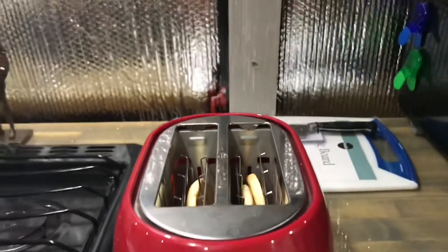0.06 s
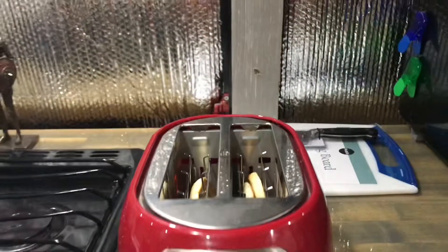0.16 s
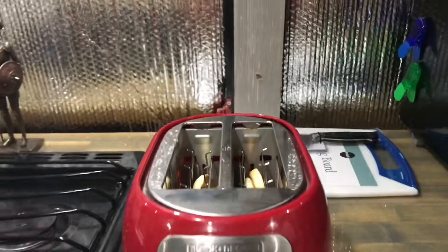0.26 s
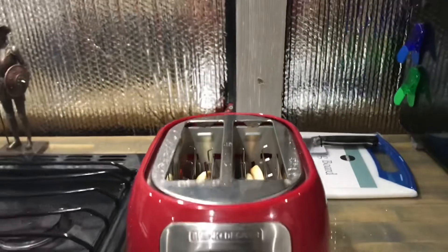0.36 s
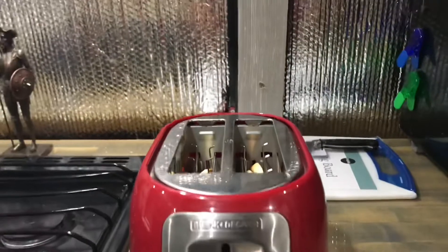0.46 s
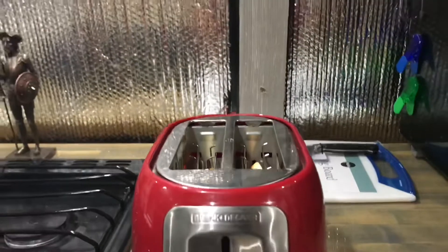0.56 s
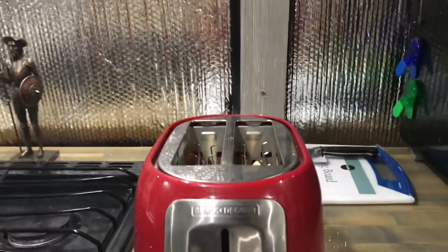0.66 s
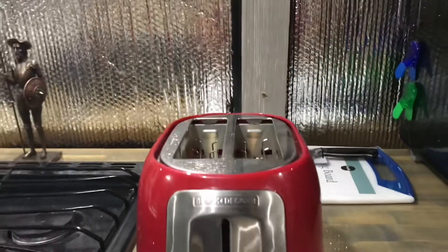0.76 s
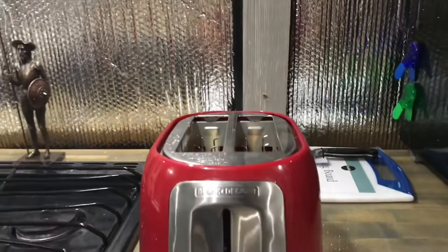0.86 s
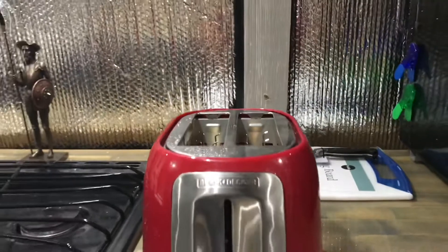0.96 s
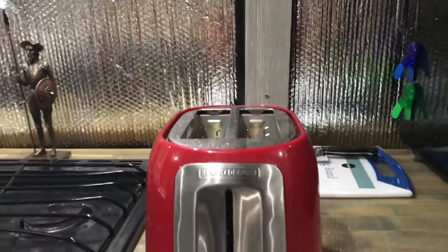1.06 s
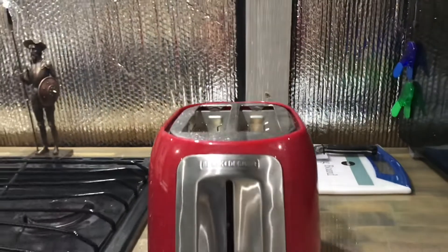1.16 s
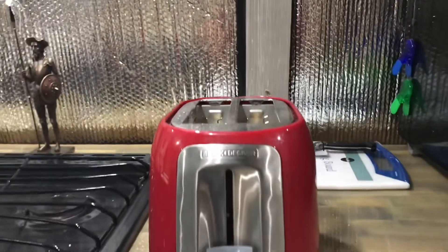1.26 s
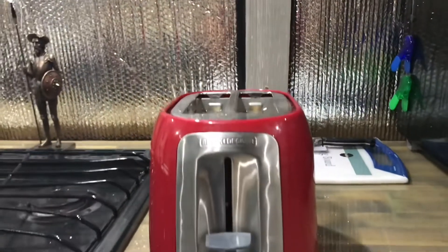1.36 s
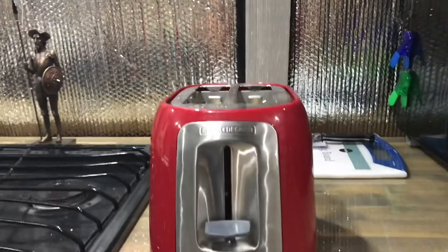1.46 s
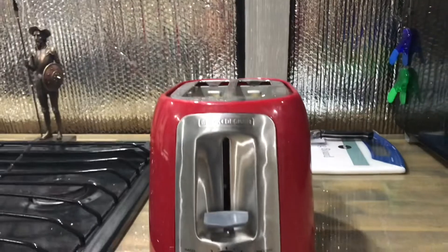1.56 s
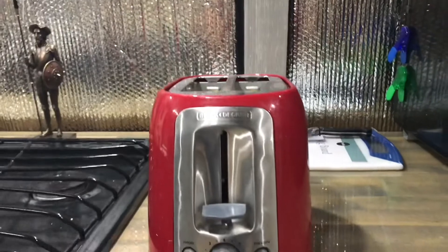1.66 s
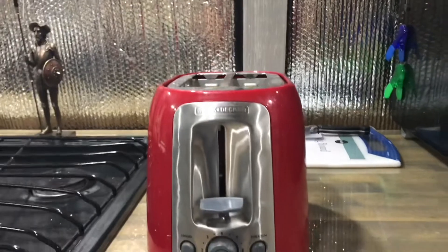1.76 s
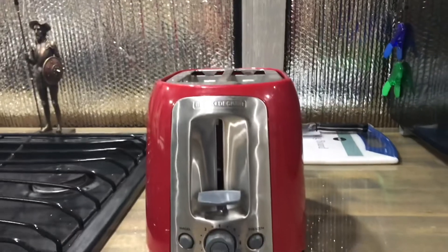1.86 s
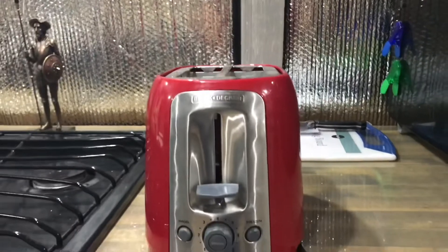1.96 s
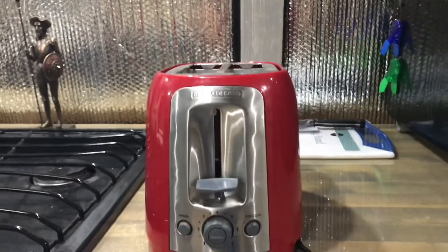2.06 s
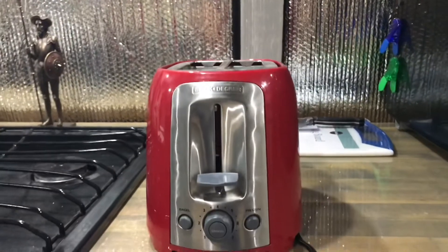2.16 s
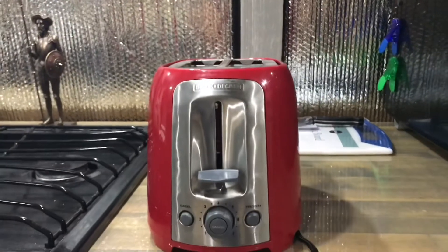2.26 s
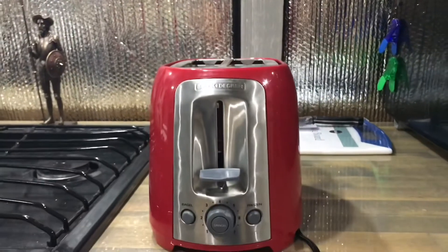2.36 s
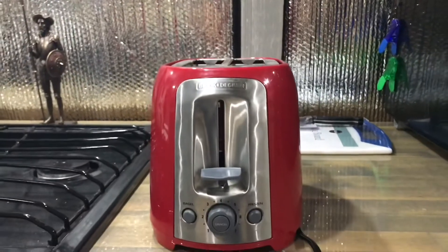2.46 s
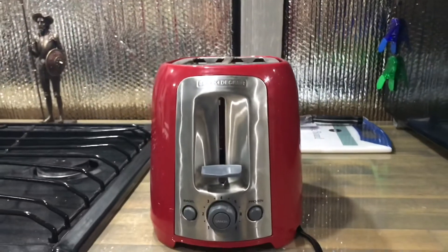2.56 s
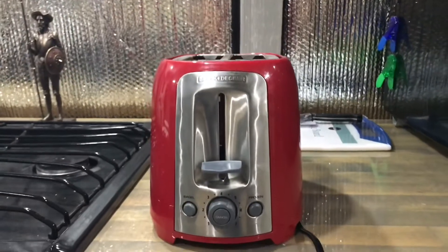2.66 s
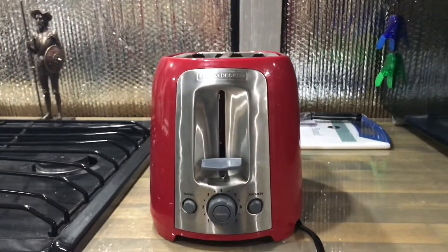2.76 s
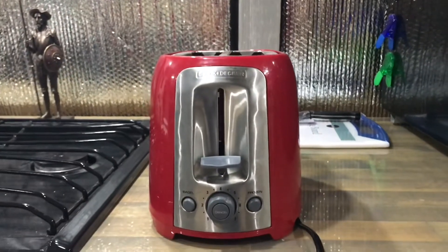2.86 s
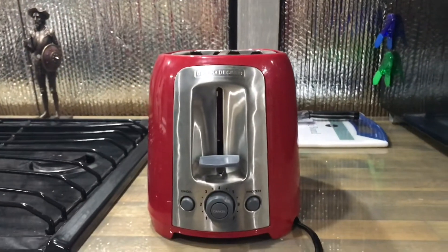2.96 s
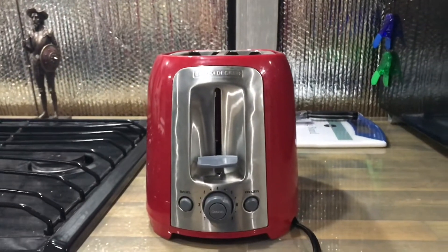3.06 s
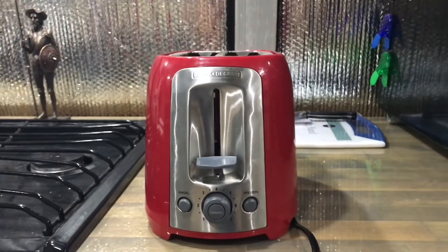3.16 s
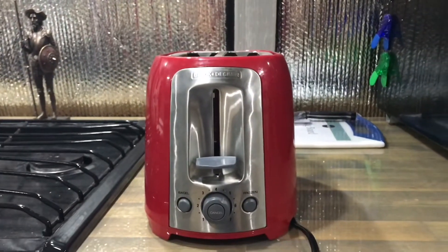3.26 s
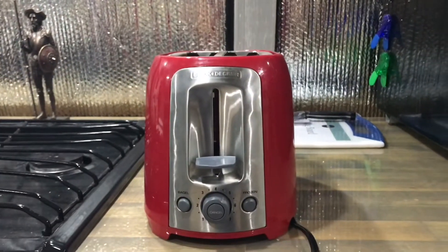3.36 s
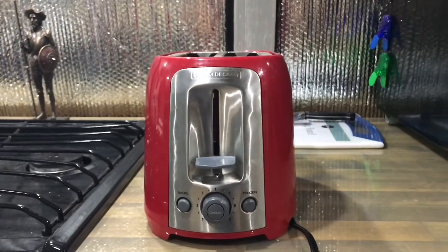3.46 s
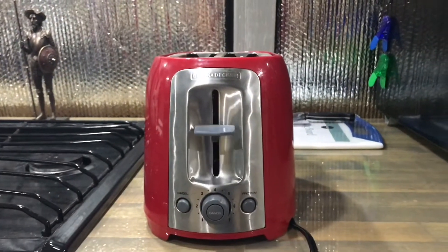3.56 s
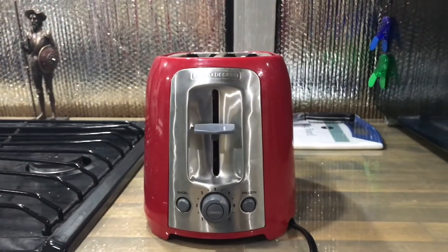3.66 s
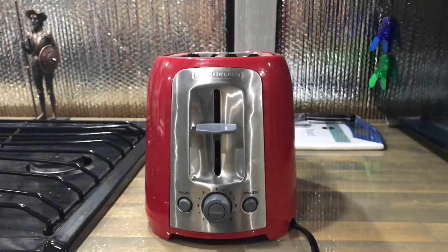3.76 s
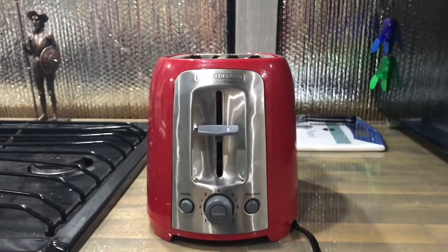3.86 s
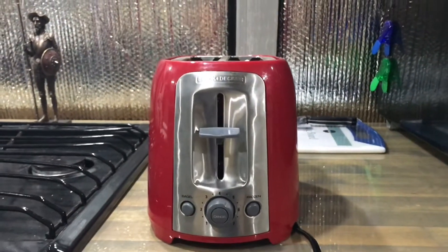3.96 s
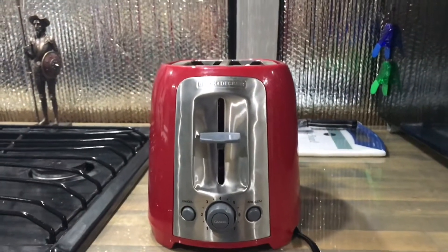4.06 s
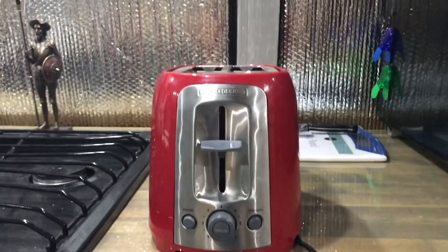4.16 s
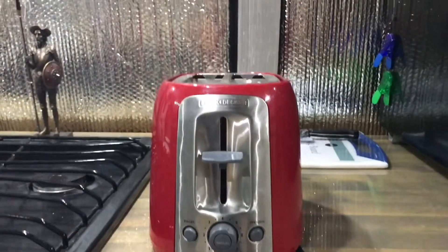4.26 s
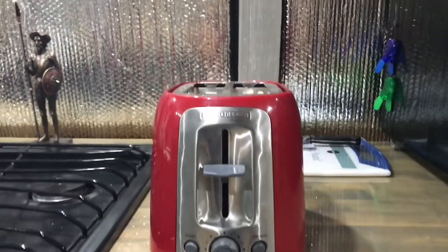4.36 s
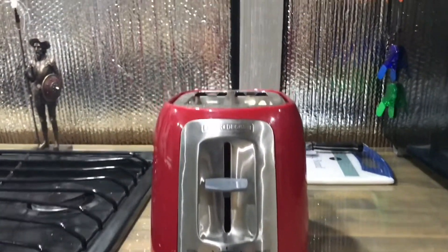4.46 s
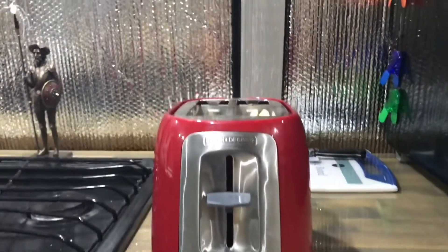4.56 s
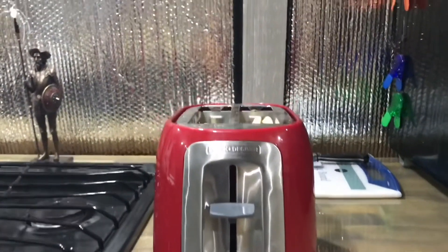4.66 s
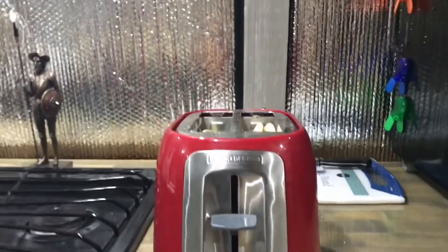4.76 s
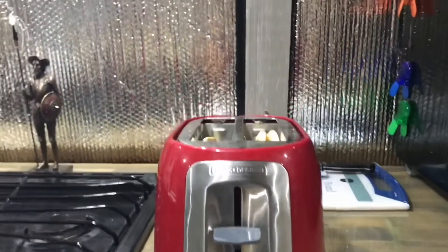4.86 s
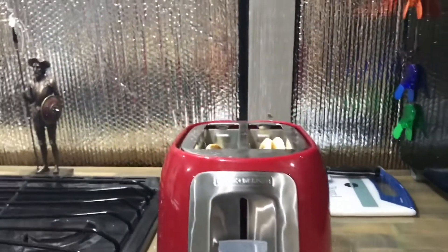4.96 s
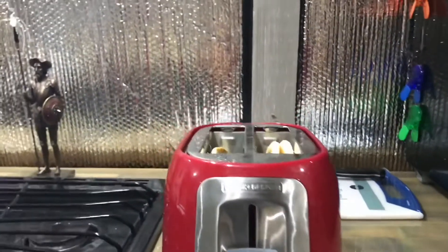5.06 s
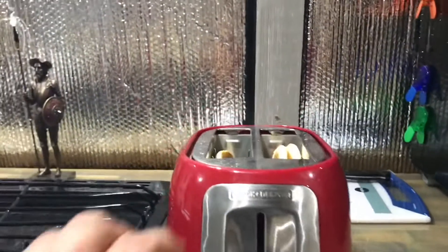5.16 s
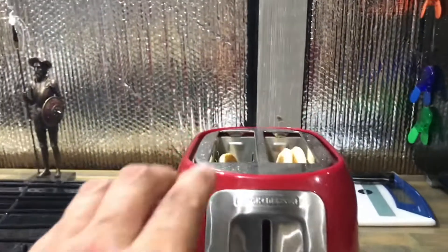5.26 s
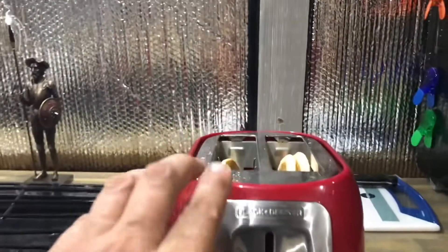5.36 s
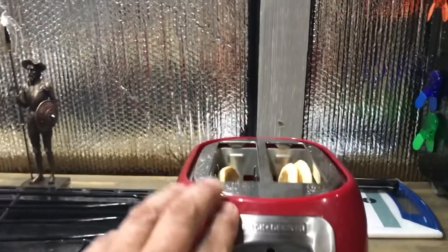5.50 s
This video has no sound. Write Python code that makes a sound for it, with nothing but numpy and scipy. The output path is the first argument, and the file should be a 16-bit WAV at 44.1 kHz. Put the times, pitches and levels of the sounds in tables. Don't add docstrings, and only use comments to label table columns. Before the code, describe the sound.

Close up in a small camper kitchen, a compressor hums very low beside a hissing fan. Before two seconds the tone thins slightly as the microphone turns. Around 3.4 seconds a toaster pops: latch click, wire rack jump, carriage slam and short metallic rattle. The hum continues, slightly faster, and a small panel snap follows at about 4.6 seconds.

```python
import sys
import numpy as np
from scipy import signal
from scipy.fft import rfft, irfft, next_fast_len
from scipy.io import wavfile
from scipy.ndimage import uniform_filter1d, map_coordinates

SR = 44100
rng = np.random.default_rng(int(sys.argv[2]) if len(sys.argv) > 2 else 0)


def natural_amplitude(level_db):
    exponent = np.asarray(level_db, float) / 20
    return 10 ** exponent


def wav_out(sig):
    wavfile.write(sys.argv[1], SR, np.round(np.clip(np.atleast_2d(sig).T, -1, 1) * 32767).astype(np.int16))


N = 243873
STEP_S, UNLOAD_S = 1.69, 3.43
LATCH_S, LIFT_S, STOP_S = 3.3818, 3.3868, 3.3903


def unit(x):
    return x / np.sqrt(np.mean(x ** 2) + 1e-20)


def along(points, hz):
    f, v = np.transpose(points)
    return np.interp(np.log(hz + 1), np.log(f + 1), v)


def resonances(table, hz):
    return natural_amplitude(sum(db / (1 + (2 * (hz - centre) / width) ** 2) for centre, width, db in table))


def filtered(x, response):
    m = next_fast_len(len(x) + 8192)
    return irfft(rfft(x, m) * response(np.fft.rfftfreq(m, 1 / SR)), m)[:len(x)]


def wobble(rate):
    return map_coordinates(rng.standard_normal(int(N * rate / SR) + 4), [np.arange(N) * rate / SR])


def ramp(start_s, length_s):
    return np.clip((np.arange(N) / SR - start_s) / length_s, 0, 1)


def state(early, later, free):
    stepped = ramp(STEP_S - .006, .012)
    unloaded = ramp(UNLOAD_S - .025, .05)
    return early + (later - early) * stepped + (free - later) * unloaded


def rush(response, patchy_db, drift_db=1.7):
    z = signal.stft(rng.standard_normal(N + 512), nperseg=512)[2]

    def smooth(bins, frames):
        field = uniform_filter1d(rng.standard_normal(z.shape), size=bins, axis=0)
        return unit(uniform_filter1d(field, size=frames, axis=1))

    gain = natural_amplitude(patchy_db * smooth(6, 14) + drift_db * smooth(2, 90))
    return unit(filtered(signal.istft(z * gain, nperseg=512)[1][:N], response))


def bursts(rows):
    out, t = np.zeros(N + 4096), np.arange(4096) / SR
    for s, db, hz, octaves, t60 in rows:
        noise = rng.standard_normal(4096)
        puff = filtered(noise, lambda f: np.exp(-(np.log2((f + 1) / hz) / octaves) ** 2))
        puff = puff * natural_amplitude(-60 * t / t60) * (1 - np.exp(-t / (0.035 * t60)))
        out[round(s * SR):][:4096] += natural_amplitude(db) * puff / np.abs(puff).max()
    return out[:N]


def puffs_after(start_s, puffs):
    return [(start_s + lag, db, hz, octaves, .018) for lag, db, hz, octaves in puffs]


def ring(start_s, modes, spread_s, rise_s):
    out, t = np.zeros(N), np.arange(SR // 2) / SR
    for hz, db, t60 in modes:
        late, phase = rng.uniform(size=2)
        swing = np.sin(2 * np.pi * (hz * t + phase * (spread_s > 0)))
        envelope = natural_amplitude(db - 60 * t / t60) * (1 - np.exp(-t / rise_s))
        out[round((start_s + late * spread_s) * SR):][:len(t)] += envelope * swing
    return out


def struck(start_s, modes):
    return natural_amplitude(-13.5) * ring(start_s, modes, .0012, .001)


def compressor():
    # (multiple, before the step [dB], after the step [dB], unloaded [dB])
    orders = [(1, -32.5, -34.5, -34.5), (2, -63, -62, -52), (3, -62, -65, -80), (4, -46.5, -47.5, -47),
              (5, -51, -54, -57), (6, -68, -62, -55), (8, -62, -65, -67), (16, -62, -64, -64),
              (18, -69, -71, -63), (20, -62, -71, -68), (21, -70, -67, -66), (22, -63, -63, -70),
              (23, -60, -59, -59), (24, -56.5, -63, -68), (26, -68, -69, -79), (32, -75, -77, -69),
              (50, -75, -75, -76)]
    shaft_hz = state(54.4, 54.42, 55.12)
    angle = 2 * np.pi * np.cumsum(shaft_hz) / SR + 0.017 * wobble(8)
    path = state(-1.35, -.65, -.65)
    hum = np.zeros(N)
    for k, *db in orders:
        flutter_db = min(.3 * (k - 1) + .1, 2.5) * wobble(4)
        start = path if k == 1 else state(*rng.uniform(0, 2 * np.pi, 3))
        hum += np.sqrt(2) * natural_amplitude(state(*db) + flutter_db) * np.cos(k * angle + start)
    return hum, angle


def fan_blades():
    level_db = state(-55, -63, -56) + 2.8 * wobble(3.54)
    hz = state(87, 87, 89) + 0.38 * wobble(2.94)
    return np.sqrt(2) * natural_amplitude(level_db) * np.sin(2 * np.pi * np.cumsum(hz) / SR)


def mains_buzz():
    level_db = -57.0 + .8 * wobble(2.6)
    return np.sqrt(2) * natural_amplitude(level_db) * np.sin(2 * np.pi * 120 * np.arange(N) / SR)


def fan_air(angle):
    # (frequency [Hz], density [dB per Hz])
    air_low = [(25, -59), (40, -38), (50, -14), (72, -10.5), (83, -11), (105, -18), (165, -15), (220, -13),
               (350, -22.5), (400, -27), (626, -16.5), (782, -23), (1260, -21), (1500, -24)]
    # (frequency [Hz], density [dB per Hz])
    air_high = [(710, -47), (1290, -14.5), (1730, -7.5), (2250, -10), (2590, -12.5), (3400, -11.5),
                (3900, -14.5), (4960, -18.5), (6000, -19), (7500, -22), (9300, -23.5), (12200, -26.5),
                (14600, -23), (15700, -21.5)]
    # (frequency [Hz], width [Hz], lift [dB])
    casing = [(351, 97, 12.5), (440, 15.3, 11), (629, 14, 1.5), (2310, 32, 6), (2778, 28, 7),
              (3497, 117, 5.5), (4550, 38, 7.5), (5800, 55, -1.5), (6210, 80, 4), (7200, 60, 5.5),
              (8560, 60, -4.5), (9300, 300, 1.5), (12920, 120, 4), (14850, 120, 3)]
    # (frequency [Hz], density [dB per Hz])
    vent_air = [(250, -39.5), (400, -2), (550, -2.5), (900, -1.5), (1300, -9.5), (1600, -10.5), (2200, -56)]

    def low_colour(f):
        return natural_amplitude(along(air_low, f)) * resonances(casing, f) / (1 + (f / 1600) ** 8)

    def high_colour(f):
        return natural_amplitude(along(air_high, f)) * resonances(casing, f)

    low = natural_amplitude(-44.0 + 0.18 * wobble(3.27)) * rush(low_colour, patchy_db=0.34)
    high = natural_amplitude(-52.0 + 0.51 * wobble(3.28)) * rush(high_colour, patchy_db=0.5)
    vent = natural_amplitude(state(-48.5, -70, -66)) * rush(lambda f: natural_amplitude(along(vent_air, f)), patchy_db=-1.5)
    throb = 1 + 0.016 * np.cos(angle) + 0.14 * np.cos(2 * angle)
    return throb * (low + vent) + high


def ticks():
    # (time [s], level [dB], centre [Hz], width [octaves], t60 [s])
    small = [
        (2.007, -40, 2500, 1, .05),
        (3.6145, -40, 4000, 1, .004),
        (3.693, -51, 13000, .1, .08),
        (4.6287, -30, 12000, .5, .003),
        (4.63, -27, 12500, .5, .002),
        (5.46, -48, 12400, .12, .07),
    ]
    return bursts(small)


def latch():
    # (time after release [s], level [dB], centre [Hz], width [octaves])
    contacts = [
        (-.0023, -44, 1500, 1),
        (0, -13, 6000, 2.2),
        (.0014, -13, 3000, 1.6),
        (.003, -13, 4500, 1.1),
    ]
    # (frequency [Hz], level [dB], t60 [s])
    modes = [(3120, -5, .03), (3650, -7, .03), (5040, -1, .035), (5390, -7, .08)]
    return puffs_after(LATCH_S, contacts), struck(LATCH_S, modes)


def rattle():
    # (frequency [Hz], density [dB per Hz])
    colour = [(400, -30), (600, -9), (800, -14), (1100, -3), (1650, 0), (2050, -7), (2850, -1), (3800, -5),
              (5400, -2), (6600, -7), (9400, -2), (12800, -10), (15100, -5), (16000, -9)]
    rise_s = .011
    grains = rng.standard_normal(N) * natural_amplitude(2 * wobble(900) + 1.4 * wobble(220))
    after = np.maximum(np.arange(N) / SR - LATCH_S - rise_s, 0)
    shake = ramp(LATCH_S, rise_s) ** 2 * natural_amplitude(-23 - 75 * after - 750 * after ** 2)
    return shake * unit(filtered(grains, lambda f: natural_amplitude(along(colour, f))))


def wire_rack():
    # (time after the jump [s], level [dB], centre [Hz], width [octaves])
    contacts = [
        (0, -12, 10600, .15),
        (.001, -10, 10400, .25),
        (.0012, -11, 14000, .4),
        (.0024, -10, 7000, 1),
        (.0028, -17, 1350, .3),
    ]
    # (frequency [Hz], level [dB], t60 [s])
    modes = [(3300, 0, .04), (5660, -6, .03), (7275, -6, .04), (8057, -5, .035), (8967, -7, .04),
             (9350, -4, .095), (9851, 0, .035), (10660, 7, .028), (11050, -5, .025), (11700, -11, .03),
             (12012, -24, .38), (15020, -14, .03)]
    return puffs_after(LIFT_S, contacts), struck(LIFT_S, modes)


def carriage_stop():
    # (frequency [Hz], level [dB], t60 [s])
    modes = [(345, -20, .06), (570, -16, .06), (960, -7, .045), (1260, -8, .055), (1400, -7, .05),
             (1640, -8, .07), (2380, -14, .05), (2820, -11, .07), (4452, -1, .055), (6240, -10, .04)]
    return [(STOP_S, -10, 4200, 1.1, .008)], struck(STOP_S - .001, modes)


def chatter():
    contacts = []
    for lag in np.cumsum(.0016 * 1.2 ** np.arange(10)):
        hz = 5000 * 2 ** rng.uniform(-1, 1)
        contacts.append((STOP_S + lag, -15 - 220 * lag, hz, 1.3, .011))
    return contacts


def slices():
    # (time [s], level [dB], centre [Hz], width [octaves], t60 [s])
    landings = [
        (3.423, -21, 12000, 1, .012),
        (3.4283, -17, 4000, 2, .015),
    ]
    return landings


def toaster():
    shaking = rattle()
    bounces = chatter()
    latch_puffs, latch_ring = latch()
    rack_puffs, rack_ring = wire_rack()
    slam, shell_ring = carriage_stop()
    contacts = bursts([*latch_puffs, *rack_puffs, *slam, *bounces, *slices()])
    return contacts + shaking + latch_ring + rack_ring + shell_ring


def camper(x):
    # (frequency [Hz], t60 [s])
    decay = [(300, 0.11), (2000, 0.69), (10000, 0.15)]
    hz, t, z = signal.stft(rng.standard_normal(SR // 2), SR, nperseg=256)
    fade = natural_amplitude(-60 * t / along(decay, hz)[:, None])
    tail = signal.istft(z * fade, SR, nperseg=256)[1]
    return signal.fftconvolve(np.pad(x, (200, 0)), tail / np.linalg.norm(tail))[:N]


def cooling_panel():
    # (frequency [Hz], level [dB], t60 [s])
    modes = [(1400, -22, .004), (2100, -18, .003), (2900, -11, .0022), (5800, -19, .002),
             (8600, -22, .0025)]
    return ring(4.6307, modes, 0, .0004)


def scene():
    hum, angle = compressor()
    pop = toaster()
    room = natural_amplitude(-17) * camper(pop)
    fan = fan_blades() + mains_buzz() + fan_air(angle)
    return (hum + fan + pop + room + ticks() + cooling_panel())[None]


def roll_off(x):
    return signal.sosfilt(signal.butter(12, 16990, fs=SR, output="sos"), x)


def record(dry):
    # (frequency [Hz], width [Hz], depth [dB])
    port = [(4900, 350, -4), (10400, 500, -4.5), (15500, 500, -2)]
    top_hz, duck_db, fall_s, back_s = 15720, -2.6, .16, .13
    heard = filtered(dry[0], lambda f: resonances(port, f))
    duck = ramp(STOP_S, fall_s) - ramp(STOP_S + fall_s, back_s)
    ducked = heard * natural_amplitude(duck_db * duck)
    top = filtered(ducked, lambda f: (f >= top_hz) * natural_amplitude(-10 - (f - top_hz) / 35))
    power = np.abs(uniform_filter1d(top ** 2, size=128))
    before = np.abs(uniform_filter1d(top ** 2, size=1025, origin=512))
    sudden = uniform_filter1d(1. * (power > 12 * before), size=512) > 0
    leak = top * uniform_filter1d(1. * sudden, size=256)
    limited = filtered(ducked, lambda f: f < top_hz)
    return roll_off((limited + leak)[None])


dry = scene()
out = record(dry)
wav_out(out)
```